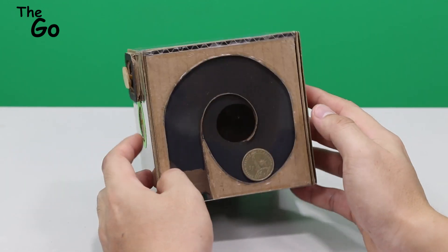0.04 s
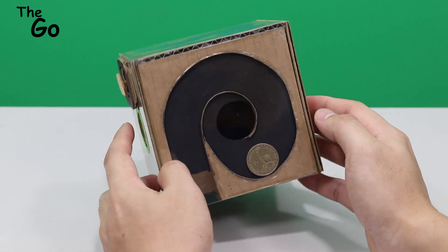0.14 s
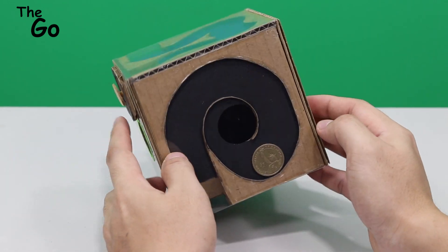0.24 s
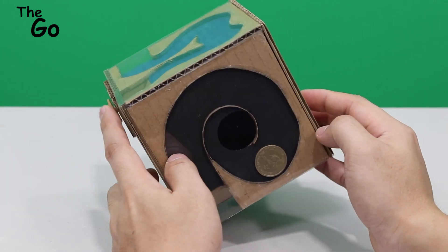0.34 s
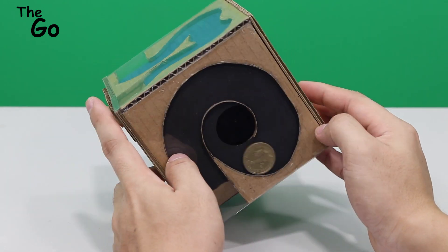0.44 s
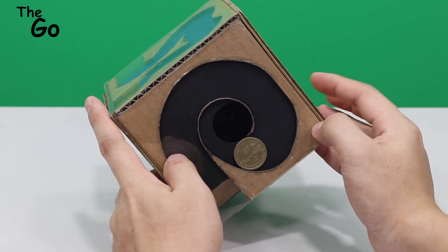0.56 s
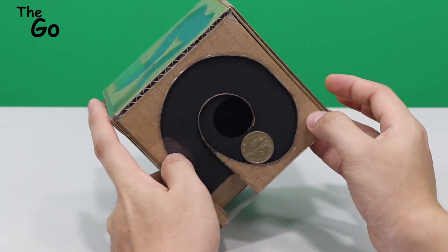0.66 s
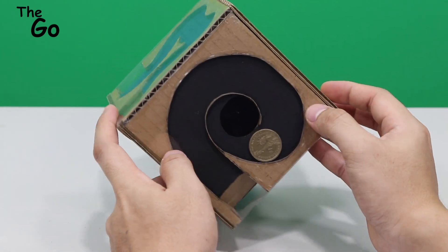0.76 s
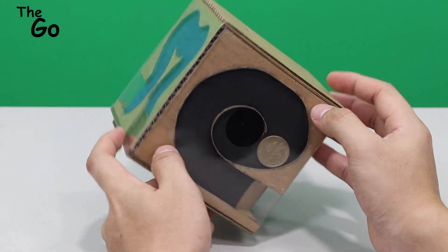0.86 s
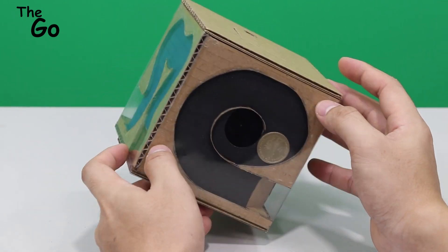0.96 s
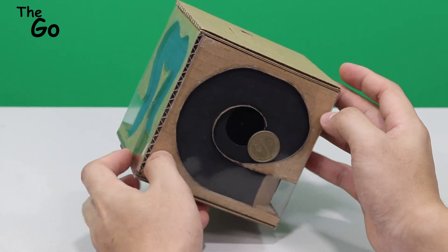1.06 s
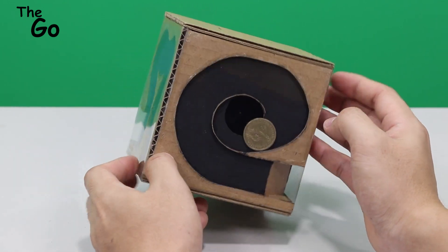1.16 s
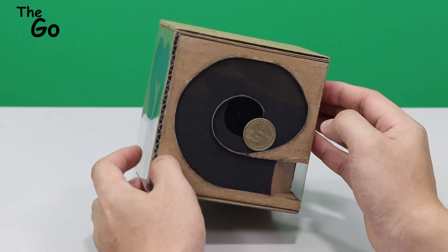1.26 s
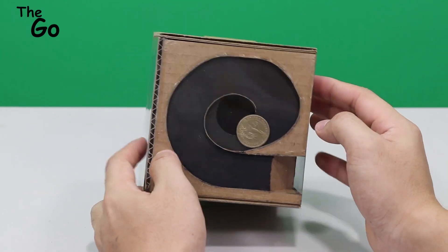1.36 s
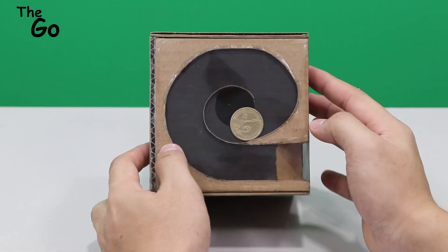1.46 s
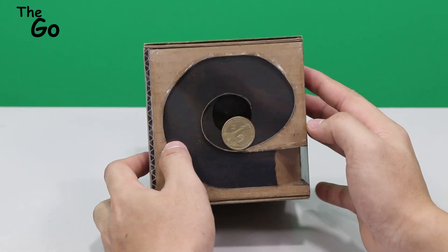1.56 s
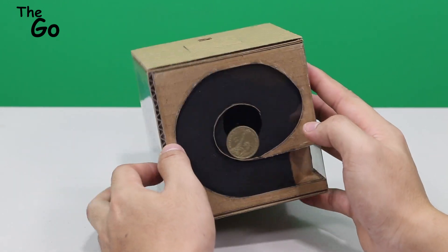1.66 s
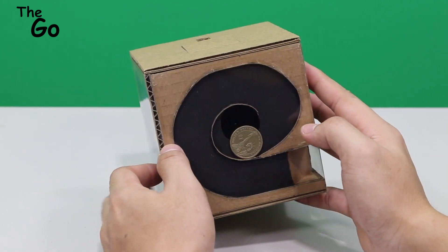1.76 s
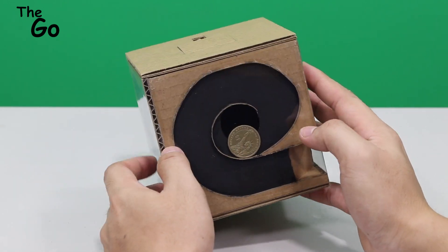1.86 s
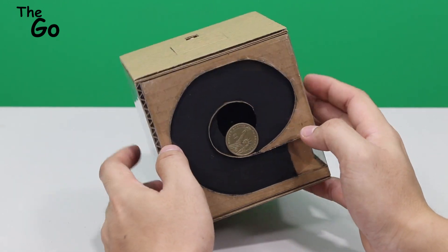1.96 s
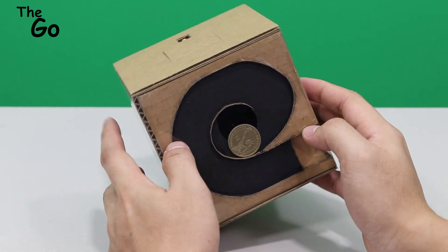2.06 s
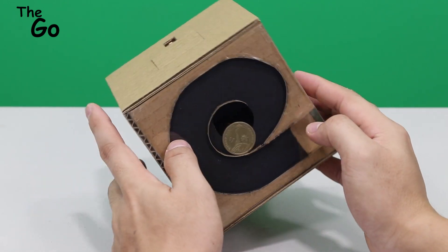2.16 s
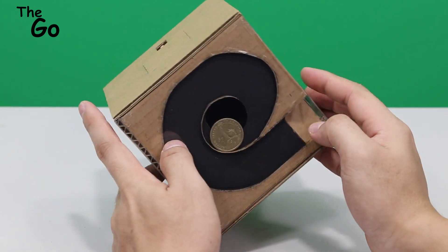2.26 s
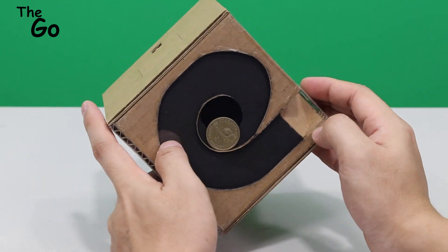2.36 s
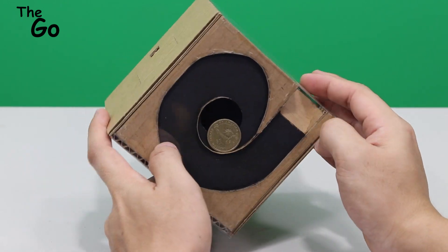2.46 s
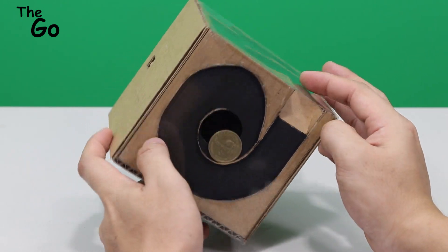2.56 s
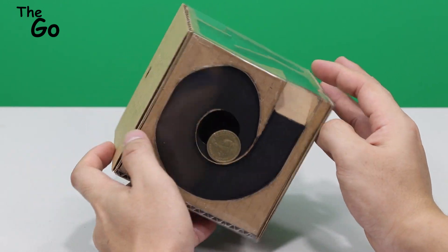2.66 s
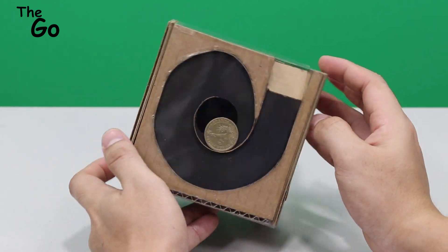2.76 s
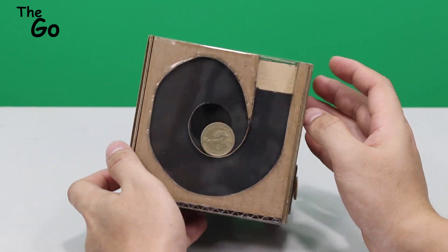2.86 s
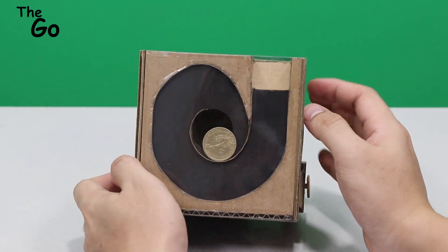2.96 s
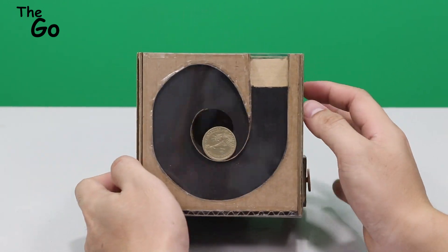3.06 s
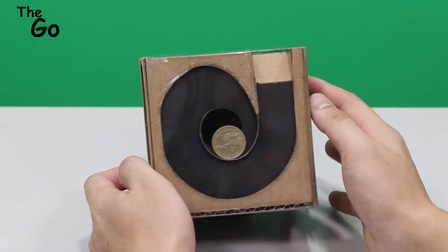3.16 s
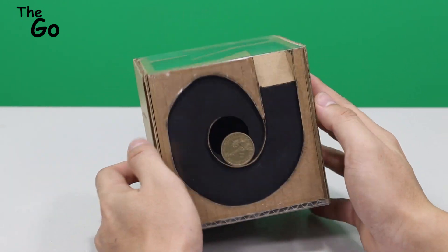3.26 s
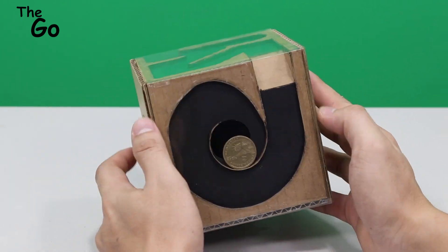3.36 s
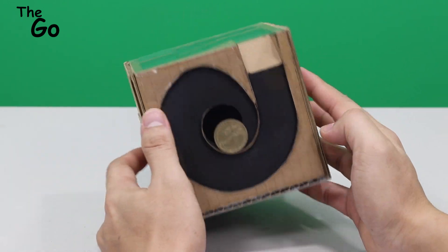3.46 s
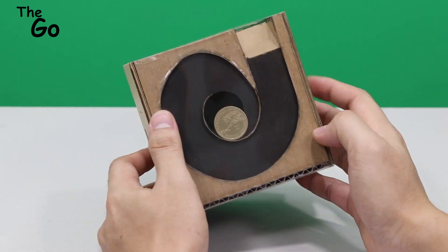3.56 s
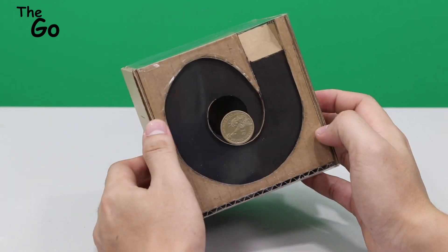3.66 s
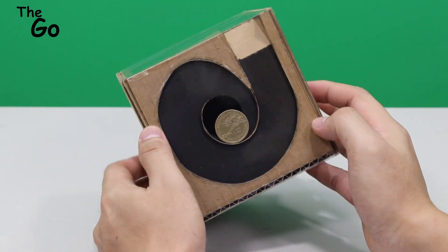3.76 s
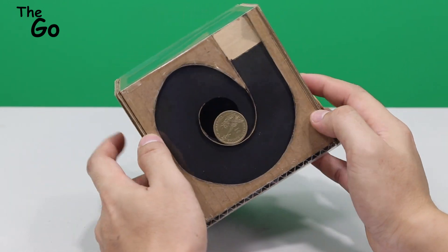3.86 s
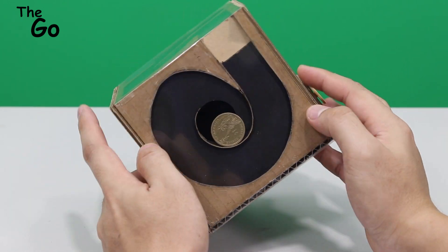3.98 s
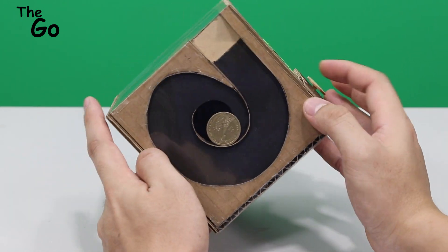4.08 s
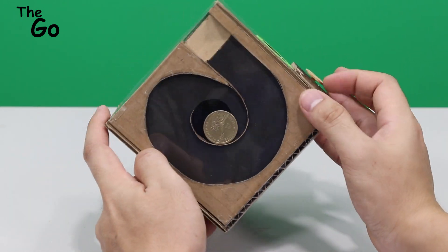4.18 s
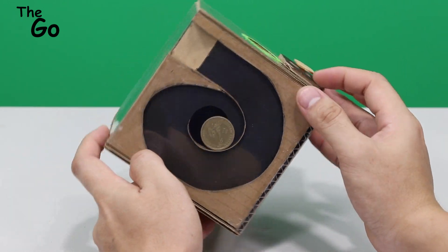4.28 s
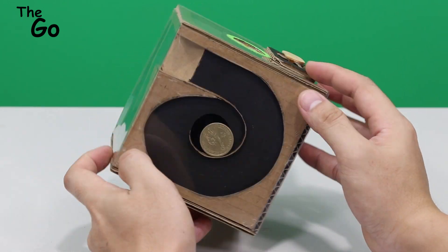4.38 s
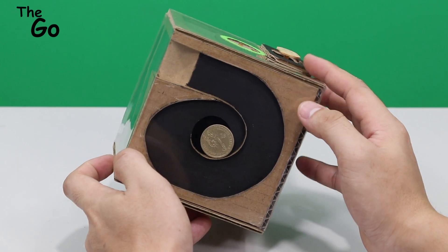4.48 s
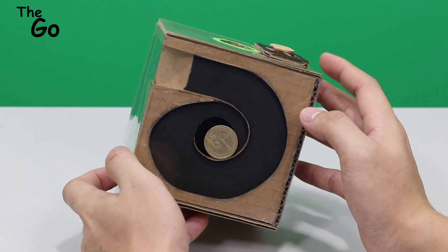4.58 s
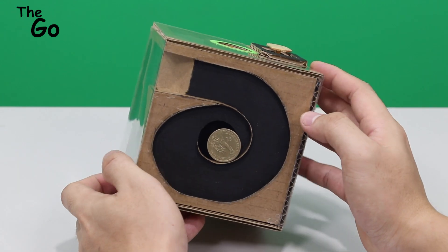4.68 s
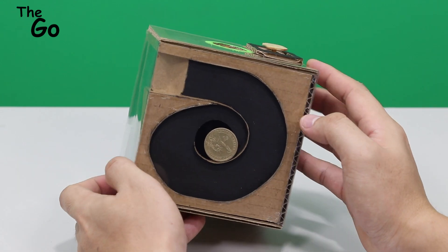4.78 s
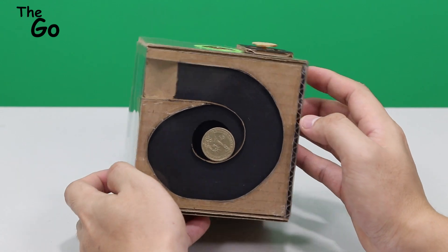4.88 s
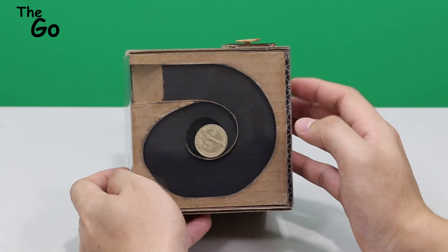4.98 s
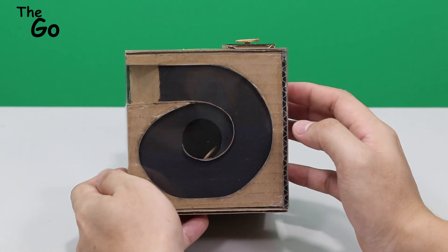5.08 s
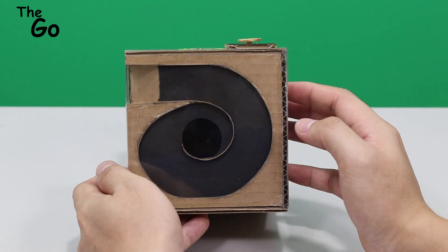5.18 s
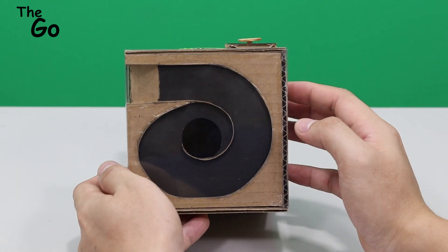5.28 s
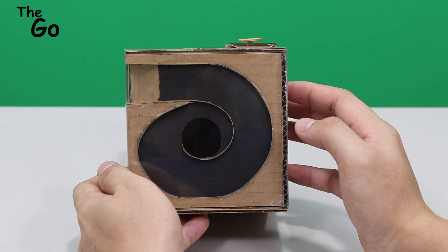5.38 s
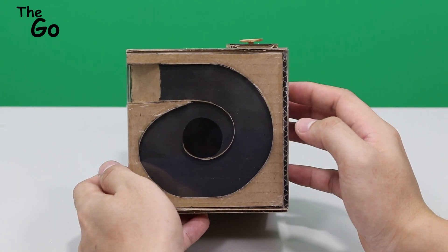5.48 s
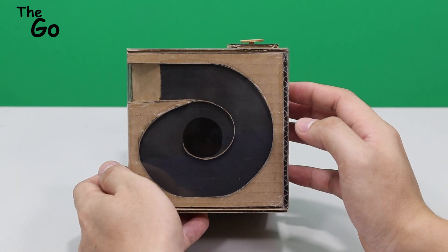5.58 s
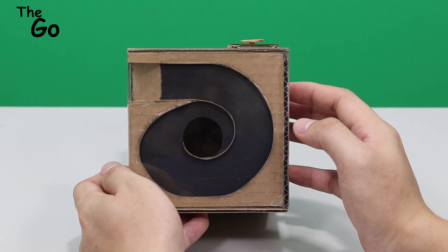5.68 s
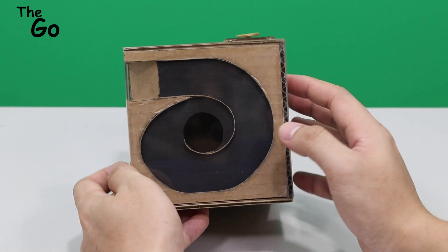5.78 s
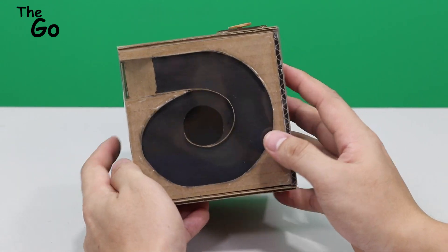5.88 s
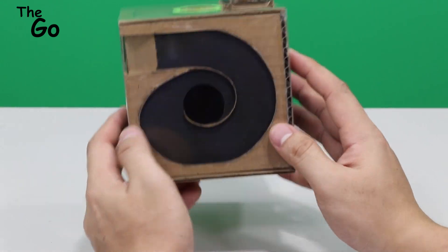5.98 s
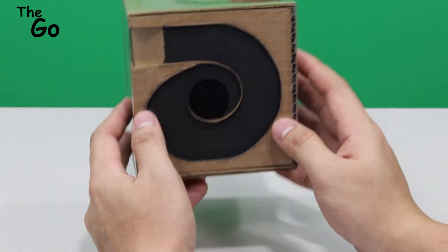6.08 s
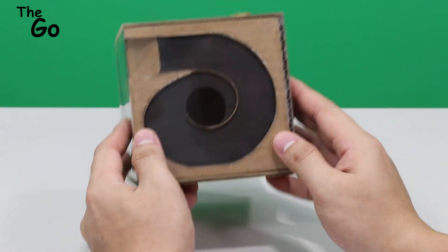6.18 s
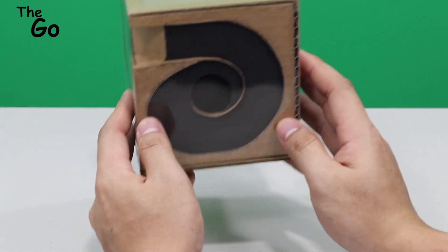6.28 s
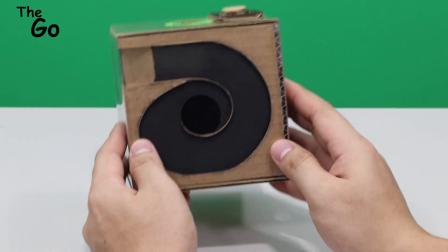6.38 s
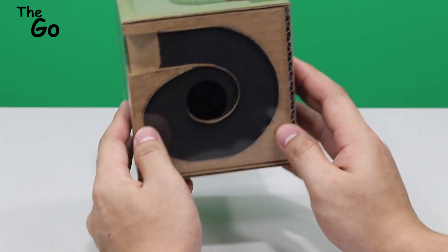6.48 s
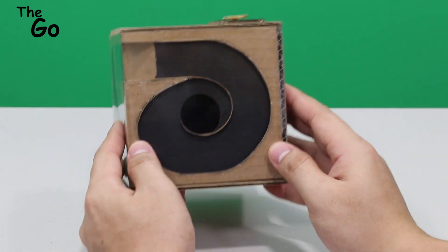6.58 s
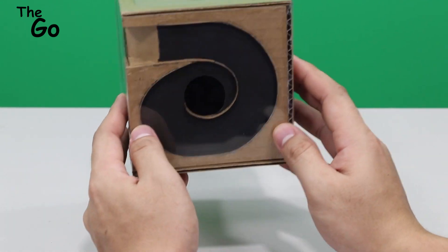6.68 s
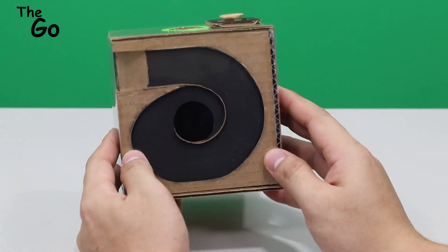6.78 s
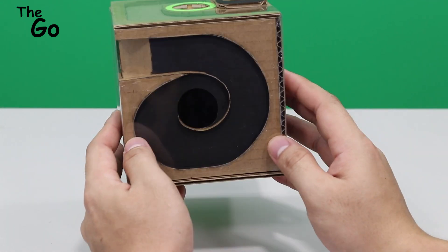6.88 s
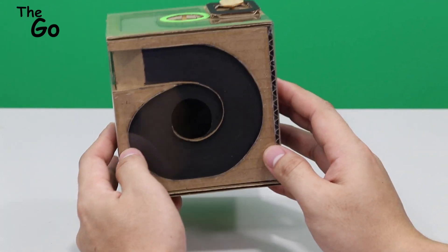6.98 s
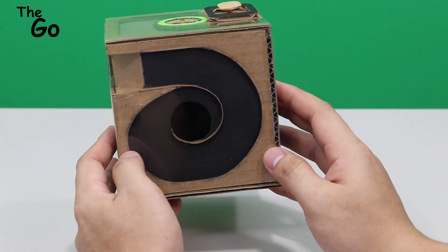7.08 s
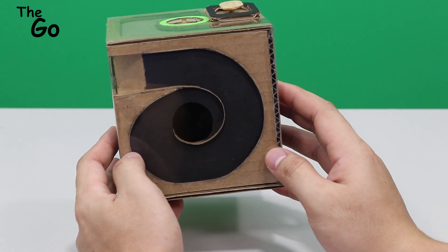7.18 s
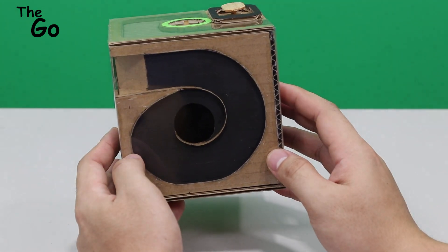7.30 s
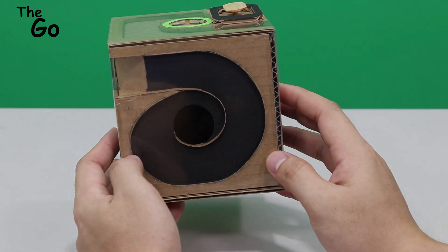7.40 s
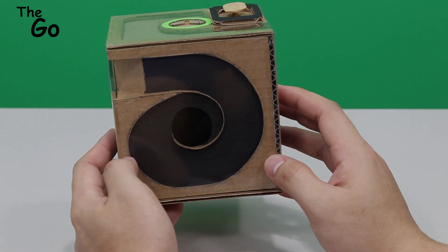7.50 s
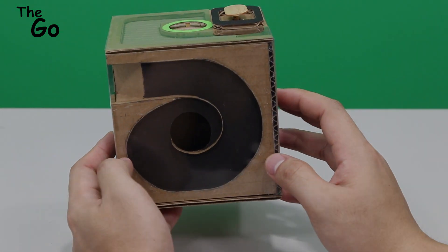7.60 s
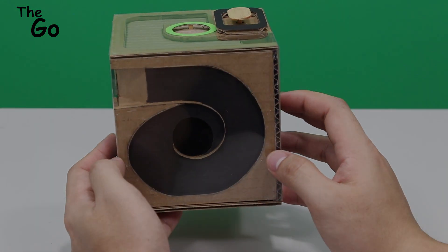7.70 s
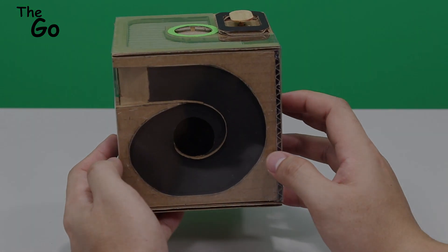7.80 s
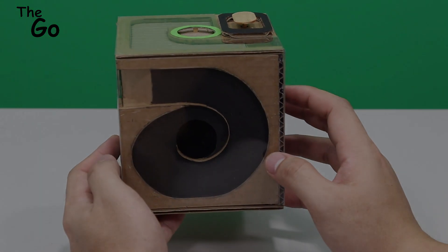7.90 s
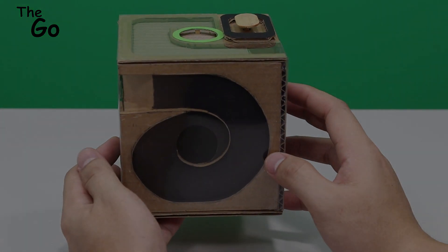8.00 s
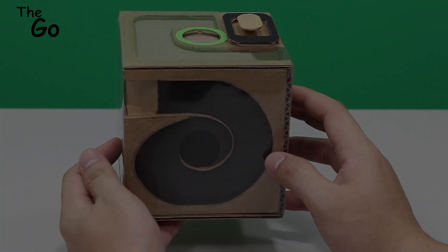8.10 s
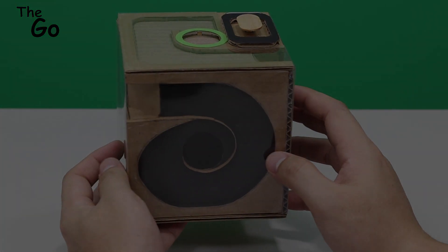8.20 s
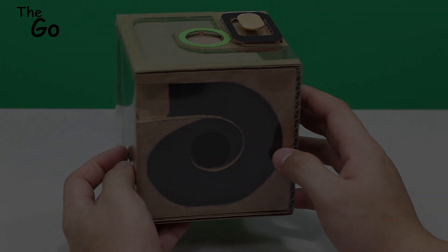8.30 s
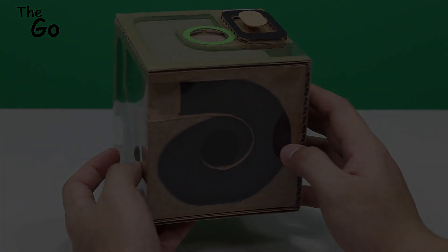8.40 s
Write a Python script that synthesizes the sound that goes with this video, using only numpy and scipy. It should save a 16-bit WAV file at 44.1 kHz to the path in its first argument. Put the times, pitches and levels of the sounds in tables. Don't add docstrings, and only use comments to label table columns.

```python
import sys
import numpy as np
from scipy import signal
from scipy.io import wavfile

SR = 44100
rng = np.random.default_rng(int(sys.argv[2]) if len(sys.argv) > 2 else 0)


def master_out(mix):
    frames = np.transpose(np.atleast_2d(mix))
    ceiling = np.clip(frames, -1, 1)
    pcm = np.round(ceiling * 32767).astype(np.int16)
    wavfile.write(sys.argv[1], SR, pcm)


def volts(x):
    e = np.asarray(x, float) / 20
    return 10 ** e


N = 372644

# frequency in Hz, level in dB, t60 in seconds.
WALL_MODES = [(274.3, -13.5, 0.091), (400, -41.5, 0.019), (500, -4, 0.021), (587, -2.5, 0.082),
              (679, -4, 0.12), (742, -3, 0.073), (942.4, 4, 0.028), (1180, 6, 0.021), (1290, 1, 0.037),
              (1440, -11.5, 0.06), (1612, 5, 0.024), (2199, 4.5, 0.024), (2807, 5.5, 0.013),
              (3500, 7, 0.0089)]
# frequency in Hz, level in dB, t60 in seconds.
COIN_HELD_MODES = [(7700, -4, .005), (8100, -2, .006), (8450, -2, .006), (8800, -2, .006), (9250, -3, .005),
                   (9800, -6, .004), (10400, -7, .005)]
# frequency in Hz, level in dB, t60 in seconds.
COIN_FREE_MODES = [(8360, -17, .25), (8475, -15, .25), (8570, -18, .22), (8650, -20, .2)]
# frequency in Hz, level in dB, t60 in seconds.
COIN_HIGH_MODES = [(14100, -8, .012), (14345, -8, .25), (14460, -14, .1), (14540, -1, .3),
                   (14750, -8, .012)]

COIN_INSIDE_S, COIN_FLIES_S = 5.2, 6.2
CARD_DAMPS_DB = -21
CONTACT_N = 5000


def contacts():
    # start in seconds, peak in dB, wall pitch in Hz, crack in dB re peak.
    knock_rows = [(0.03, -9.5, 400, -37), (0.077, 8.5, 560, -31.5), (0.215, 3, 1180, -27.5),
                  (0.312, -4, 882, -24), (0.441, -9.5, 1120, -20), (2.422, 0, 890, -18),
                  (2.432, -2, 760, -22.5), (2.497, -7.5, 760, -23.5), (3.044, -8, 410, -32),
                  (3.305, -6, 780, -29.5), (3.66, -1.5, 1355, -21.5), (3.873, -13.5, 480, -18),
                  (5.217, 4, 640, -30.5), (5.437, -10, 1180, -37.5), (6.229, -3, 730, -27),
                  (6.479, 4.5, 677, -23.5), (6.504, 2.5, 710, -21.5), (6.677, 7, 1083, -36.5),
                  (6.686, 1, 1180, -32), (6.703, 5.5, 643, -16.5), (6.872, 3, 746, -32),
                  (6.889, 0, 490, -44), (6.917, -0.5, 648, -26), (7.068, 0.5, 1065, -31),
                  (7.099, -1.5, 1120, -23), (7.147, -5, 1060, -23)]
    # start in seconds, peak in dB, wall pitch in Hz,
    # crack in dB re peak.
    snap_rows = [(0.038, 0.5, 1310, -25.5), (0.206, -8, 1720, -22), (0.359, -10, 1620, -25.5),
                 (1.687, 5, 2300, -16), (2.671, -13, 950, -21), (3.329, -18, 1430, -26),
                 (3.374, -0.5, 1975, -34.5), (3.478, -5, 1650, -32), (3.495, -7.5, 1782, -33),
                 (3.528, -14, 1810, -37.5), (4.334, -1.5, 1482, -16.5), (5.559, -1, 1200, -23),
                 (5.66, -5, 1045, -19), (6.906, 7.5, 1110, -25), (6.931, -10.5, 1840, -30.5)]
    # start in seconds, peak in dB, wall pitch in Hz, low ring in dB
    # re peak, high ring in dB re peak.
    clink_rows = [(0.479, -4, 2940, 14.5, -15), (0.556, -13.5, 1800, 20, -30), (1.152, -6, 1075, 13, -20),
                  (1.196, -13.5, 840, 11, -21), (2.416, -6.5, 1010, 5.5, -30), (2.628, -13.5, 690, 5, -30),
                  (2.985, -32, 850, 17, -18), (3.412, -18, 670, 6, -28), (3.441, -17, 1450, 8, -33),
                  (3.555, 1, 1440, 11, -40.5), (3.758, -22, 553, 14, -11.5), (4.288, -15.5, 520, 5, -32),
                  (5.261, 5, 1620, -2.5, -32.5), (5.305, 3, 1580, 7.5, -28), (5.372, -3, 1710, -4, -29),
                  (6.24, 5.5, 1367, -22, -33), (6.29, -4, 700, -4, -24), (6.492, -4.5, 710, -9, -15.5),
                  (6.549, -11.5, 650, -5.5, -8), (6.602, -12.5, 655, -3, -24.5), (6.667, -21, 620, 11, -14),
                  (6.715, -23, 627, 2, -1), (7.019, -12, 650, -11, -13), (3.046, -28.5, 500, -16, -19)]
    # start in seconds, peak in dB, wall pitch in Hz.
    bounce_rows = [(0.045, -6.5, 382), (0.112, -23, 500), (0.347, -12.5, 844), (0.382, -17, 475),
                   (0.422, -29, 490), (0.459, -19.5, 587), (2.107, -27, 560), (2.357, -25.5, 1070),
                   (2.381, -20, 1020), (2.557, -19.5, 613), (2.696, -20, 393), (3.29, -28.5, 1380),
                   (3.421, -11, 664), (4.168, -27.5, 550), (4.215, -27, 590), (4.252, -28, 553),
                   (4.276, -21, 600), (4.425, -13, 1450), (5.545, -13, 860), (6.848, -11.5, 610),
                   (7.054, -9.5, 1180), (7.322, -12, 1180), (7.358, -15, 1150), (7.394, -12.5, 960),
                   (7.414, -16, 960)]
    # start in seconds, peak in dB.
    touch_rows = [(0.991, -32), (1.078, -35), (1.456, -32), (1.501, -37), (1.544, -37), (1.563, -36.5),
                  (1.634, -38), (2.092, -40), (2.188, -37), (2.816, -35), (3.258, -30.5), (4.604, -20.5),
                  (4.907, -24.5), (5.065, -28), (5.846, -41.5), (6.048, -32.5), (8.299, -40), (8.377, -36)]
    ring_under_crack_db, high_under_low_db = -19, -13
    rows = []
    for table, kind in ((knock_rows, (0, 5, .0009)), (snap_rows, (15, 7, .0005))):
        for s, peak_db, hz, crack_db in table:
            low_db = crack_db + ring_under_crack_db
            rows.append((s, peak_db, hz, crack_db, low_db, low_db + high_under_low_db, *kind))
    for s, peak_db, hz, low_db, high_db in clink_rows:
        rows.append((s, peak_db, hz, -21, low_db, high_db, -4, 10, .0009))
    for s, peak_db, hz in bounce_rows:
        rows.append((s, peak_db, hz, -33, -34.5, -48, -10, 7.5, .002))
    for s, peak_db in touch_rows:
        rows.append((s, peak_db, 448, -19, -21, -47, -8, 4.5, .001))
    return rows


def box_body(t, noise, hz, linger, snap_db, fall_db, build_s):
    modes = [(f * linger, db, t60) for f, db, t60 in WALL_MODES + WALL_MODES]
    walls = struck(modes, t / linger, lambda f: -10.5 - fall_db * np.abs(np.log2(f / linger / hz)),
                   shift=0.032, spread_db=3.0)
    push_cycles, snap_cycles = 13.7, 1.6
    decay = volts(-60 * t * hz / (push_cycles * linger)) + volts(snap_db - 60 * t * hz / snap_cycles)
    push = decay * np.sin(2 * np.pi * hz * t)
    chatter = rms_one(band(band(noise, hz / 1.57, hz * 1.8), hz / 1.69, hz * 2.72))
    chatter = chatter * volts(-14 - 60 * t / (0.024 * linger))
    body = (walls + push + chatter) * (1 - np.exp(-(t / build_s) ** 2))
    return body / np.abs(body).max()


def card_crack(t, noise):
    spread_s = .0025
    sweep = np.clip((t - .0006) / spread_s, 0, 1)
    window = np.sqrt(np.sin(np.pi * sweep).clip(0))
    phase = 2 * np.pi * spread_s * (13000 * sweep - 5800 * sweep ** 2) + noise[0, 1]
    chirp = volts(2.0 * noise[:, :1]) * window * np.sin(phase)
    return band(chirp + noise[::-1, ::-1] * volts(-15 - 60 * t / 0.02), 2000, 10500)


def coin_ring(t, s, low_db, high_db):
    free_db = low_db + CARD_DAMPS_DB * (s < COIN_FLIES_S)
    metal = struck(COIN_HELD_MODES, t, lambda f: low_db, shift=0.019, spread_db=-5.5)
    metal += struck(COIN_FREE_MODES, t, lambda f: free_db, shift=0.0011, spread_db=6.5)
    metal += struck(COIN_HIGH_MODES, t, lambda f: high_db, shift=.0006, spread_db=-2)
    return metal * (1 - t / t[-1])


def knocks():
    out, t = np.zeros((2, N + CONTACT_N)), np.arange(CONTACT_N) / SR
    for s, peak_db, hz, crack_db, low_db, high_db, snap_db, fall_db, build_s in contacts():
        linger = 1.5 if s > COIN_INSIDE_S else .9
        noise = rng.standard_normal((2, CONTACT_N)) + 0.66 * rng.standard_normal(CONTACT_N)
        body = box_body(t, noise, hz, linger, snap_db, fall_db, build_s)
        sharp = volts(crack_db + 14) * card_crack(t, noise) + coin_ring(t, s, low_db, high_db)
        sharp = sharp * (1 - np.exp(-(t / 0.0024) ** 2))
        at = round((s + .0008) * SR)
        out[:, at:at + CONTACT_N] += volts(peak_db) * (body + sharp)
    return out[:, :N]


def jingle():
    slips_per_s, hands_db = 1500, -28
    slips = (rng.random((2, N)) < slips_per_s / SR) * rng.standard_normal((2, N))
    slips = (sliding(column=3) + hands(hands_db)) * slips
    free = slips * volts(CARD_DAMPS_DB * (np.arange(N) < COIN_FLIES_S * SR))
    out = 0
    for modes, clicks, offset_db, sway_db, rate in ((COIN_HELD_MODES, slips, -7, 7.6, 5.7),
                                                    (COIN_FREE_MODES, free, -1.5, 3.0, 11),
                                                    (COIN_HIGH_MODES, slips[::-1], -25.5, 4.0, 9)):
        for hz, db, t60 in modes:
            out = out + volts(db + offset_db + sway_db * drift(rate)) * ring(clicks, hz, t60)
    return out


def rubbing():
    # frequency in Hz, level in dB per Hz.
    rustle_spectrum = [(710, -24.5), (1200, 8.5), (1490, -10), (1660, 12), (3830, 3.5), (4650, -11),
                       (8630, 0.5), (16000, -30.5)]
    born = rng.random(N) < 700 * volts(4.0 * drift(40)) / SR
    slips = born * volts(7.5 * np.minimum(rng.exponential(1, N), 3)) * rng.choice([-1, 1], N)
    deep = sum(volts(db) * ring(slips, hz, 0.61 * t60) for hz, db, t60 in WALL_MODES[:3])
    upper = sum(volts(db) * ring(slips, hz, 0.61 * t60) for hz, db, t60 in WALL_MODES[3:11])
    deep_gain = np.where(np.arange(N) > COIN_INSIDE_S * SR, volts(-15.0), volts(3.5))
    rumble = rms_one(upper + deep * deep_gain)
    rustle = rms_one(diffuse(N, lambda hz: volts(at_hz(rustle_spectrum, hz) + 5.6 * drift(9.9))))
    slide = sliding(column=2)
    rumble = volts(-8.5) * (slide + hands(-1.5)) * rumble
    return rumble + volts(-3.5) * (volts(-14.5) * slide + hands(0)) * rustle


def sliding(column):
    # start in seconds, length in seconds, wall rumble in dB, coin jingle in dB.
    slide_rows = [(0.05, .2, -28, -57.5), (0.34, 0.18, -24.5, -72.5), (0.54, 0.01, -45.5, -28),
                  (2.4, 0.053, -22.5, -40.5), (2.58, .12, -24.5, -65.5), (3.06, 0.0067, -37, -41),
                  (3.45, 0.04, -51, -38), (3.57, 0.06, -22, -65.5), (3.7, 0.12, -31, -61),
                  (4.2, .3, -33.5, -71), (5.38, 0.06, -22, -44.5), (5.46, 0.017, -44, -41),
                  (6.39, 0.0067, -19.5, -43.5), (6.47, 0.16, -22, -38.5), (6.79, 0.018, -17, -30),
                  (6.92, .28, -22, -37.5)]
    return swells(slide_rows, column, rise_db=206, fall_db=202)


def hands(offset_db):
    # time in seconds, level in dB.
    busy_rows = [(0, -43), (.75, -52.5), (1.0, -49.5), (1.2, -44.5), (1.601, -63), (1.88, -55), (2.04, -66),
                 (2.3, -45), (2.9, -49), (3.3, -58.5), (4.0, -50.5), (4.6, -55.5), (5.2, -55), (5.8, -56.5),
                 (6.199, -49.5), (7.3, -83.5), (7.5, -68.5), (8.45, -59)]
    return volts(offset_db + np.interp(np.arange(N) / SR, *np.transpose(busy_rows)))


def drone():
    # start in seconds, length in seconds, drone in dB.
    lean_rows = [(.03, 0.31, -34.5), (1.72, 0.053, -34.5), (2.42, .01, -40), (3.06, 0.019, -29.5),
                 (3.46, 0.34, -53), (3.95, .02, -47), (4.35, .02, -41), (4.56, 0.68, -45.5),
                 (5.1, 0.18, -43.5), (5.46, 0.017, -40), (6.47, 0.48, -53)]
    hum = rms_one(band(band(rng.standard_normal(N), 100, 330), 60, 240))
    return volts(-3.5) * (swells(lean_rows, column=2, rise_db=241, fall_db=154) + hands(-6.5)) * hum


def room(x):
    # frequency in Hz, t60 in seconds, level in dB.
    decay_rows = [(150, 0.4, -16.5), (400, 0.6, -6.5), (1080, 0.56, -13), (2750, 0.48, -9),
                  (7700, 0.43, -11.5), (15000, 0.41, 0.5)]
    t = np.arange(SR) / SR
    tail = diffuse(SR, lambda hz: volts(at_hz(decay_rows, hz, axis=2) - 60 * t / at_hz(decay_rows, hz)))
    tail *= np.clip((t - .004) / 0.0017, 0, 1) * (volts(-26.5) + volts(-25.0 - 60 * t / 0.017))
    return signal.fftconvolve(tail, x.mean(0)[None], axes=1)[:, :N]


def room_floor():
    # frequency in Hz, level in dB per Hz.
    floor_spectrum = [(12, -37), (20, -12), (44, -4.5), (70, -13), (123, -10.5), (158, -3.5), (270, -10.5),
                      (399, -6.5), (1960, -24.5), (2670, -25), (4810, -33.5), (7110, -28), (16000, -32.5)]
    return volts(-52) * rms_one(diffuse(N, lambda hz: volts(at_hz(floor_spectrum, hz) + 3.4 * drift(6))))


def struck(modes, t, extra_db, shift, spread_db):
    hz, level_db, t60 = np.transpose(modes)[:, :, None]
    hz = hz * (1 + shift * rng.standard_normal(hz.shape))
    level_db = level_db + extra_db(hz) + spread_db * rng.standard_normal((2, *hz.shape))
    return (volts(level_db) * (volts(-60 * t / t60) * np.sin(2 * np.pi * hz * t))).sum(1)


def ring(clicks, hz, t60):
    r, w = volts(-60 / (t60 * SR)), 2 * np.pi * hz / SR
    return signal.lfilter([0, np.sin(w)], [1, -2 * r * np.cos(w), r * r], clicks + 1e-18)


def swells(rows, column, rise_db, fall_db):
    t = np.arange(0, N, 64) / SR
    start, length, db = np.array(rows)[:, [0, 1, column], None].transpose(1, 0, 2)
    db = db - rise_db * np.maximum(start - t, 0) - fall_db * np.maximum(t - start - length, 0)
    return np.interp(np.arange(N) / SR, t, volts(db).sum(0))


def diffuse(size, gain):
    # frequency in Hz, left-right likeness from 0 to 1.
    likeness_rows = [(60, 0.5), (250, 0.93), (700, .6), (2000, 0.34), (6000, 0.027), (15000, .02)]
    edges_hz = 22 * 2 ** np.arange(0, 9.7, .4)
    out, white = 0, rng.standard_normal((2, 2, size))
    for k, (low, high) in enumerate(zip(edges_hz, edges_hz[1:])):
        mid, side = band(white[k % 2], low, high)
        hz = np.sqrt(low * high)
        alike = np.clip(at_hz(likeness_rows, hz), 0, 1)
        out = out + gain(hz) * (np.sqrt(1 + alike) * mid + np.sqrt(1 - alike) * side * [[1], [-1]])
    return out


def drift(rate):
    knots = rng.standard_normal(400)
    return np.interp(np.arange(N) / SR * rate, np.arange(400), knots)


def band(x, low_hz, high_hz):
    sos = signal.butter(2, [low_hz, min(high_hz, .49 * SR)], "band", fs=SR, output="sos")
    return signal.sosfilt(sos, x)


def at_hz(rows, hz, axis=1):
    return np.interp(np.log(hz), np.log(np.array(rows)[:, 0]), np.array(rows)[:, axis])


def rms_one(x):
    return x / np.sqrt(np.mean(x ** 2) + 1e-20)


def scene():
    near = knocks() + jingle() + rubbing()
    no_bass = signal.butter(4, 170, "high", fs=SR, output="sos")
    near = signal.sosfilt(no_bass, near) + drone()
    near[0] = signal.lfilter([.3, 1], [1, .3], near[0])
    table_echo = np.roll(near, 150, axis=1) * volts([[-12], [-11]])
    wall_echo = band(np.roll(near, round(.0115 * SR), axis=1), 440.0, 2500) * volts(-10.5)
    return near + table_echo + wall_echo + room(near) + room_floor()


def roll_off(x):
    return signal.sosfilt(signal.butter(12, 16410, fs=SR, output="sos"), x)


def record(dry):
    capsule_top = signal.cheby2(16, 40, 16100, fs=SR, output="sos")
    dry = signal.sosfilt(capsule_top, dry)
    threshold_db, recovery_db_per_s = -3, 60
    over_db = np.maximum(20 * np.log10(np.abs(dry).max(0) + 1e-9) - threshold_db, 0)
    slope_db = recovery_db_per_s * np.arange(N) / SR
    duck_db = np.maximum.accumulate(over_db + slope_db) - slope_db
    duck_db = signal.lfilter([.02], [1, -.98], duck_db)
    mix = np.clip(dry * volts(-.8 * duck_db), -1, 1)
    return roll_off(mix)


dry = scene()
out = record(dry)
master_out(out)
```